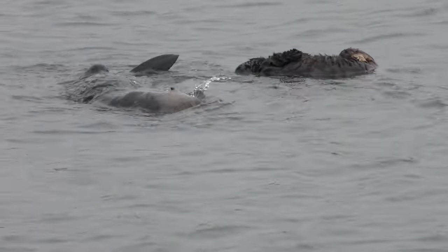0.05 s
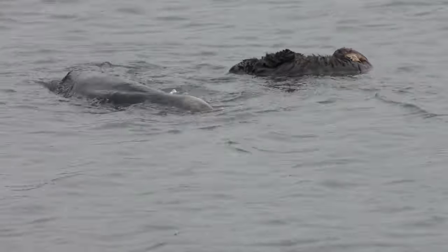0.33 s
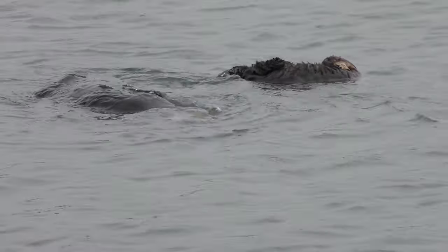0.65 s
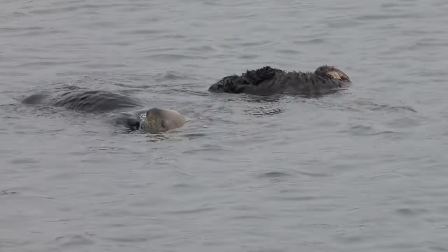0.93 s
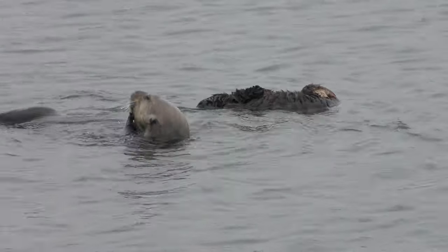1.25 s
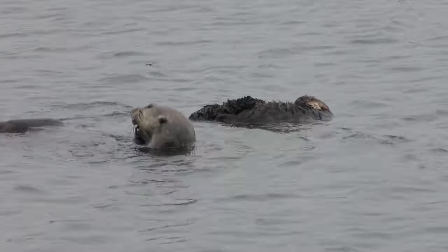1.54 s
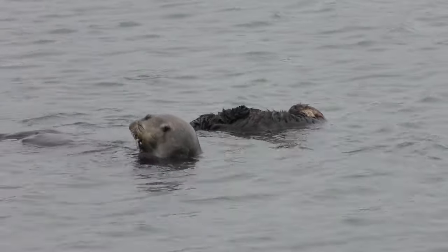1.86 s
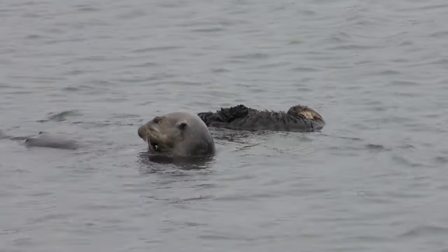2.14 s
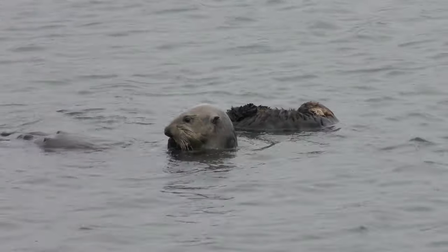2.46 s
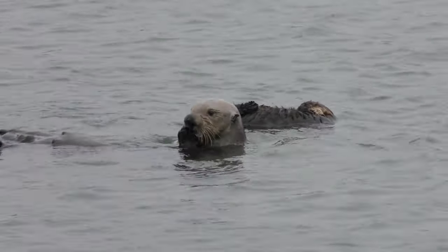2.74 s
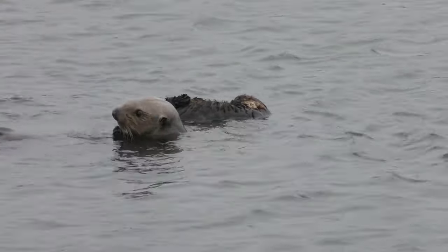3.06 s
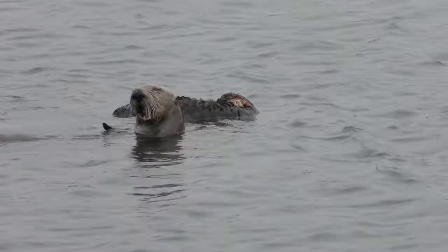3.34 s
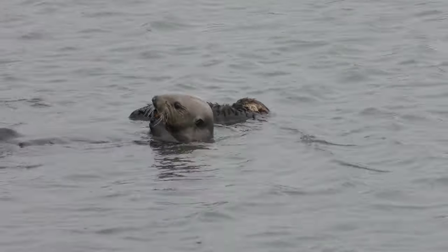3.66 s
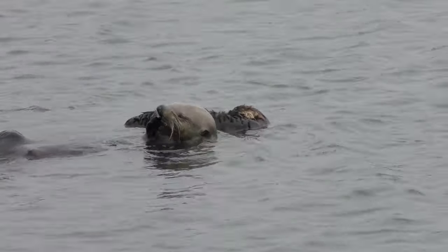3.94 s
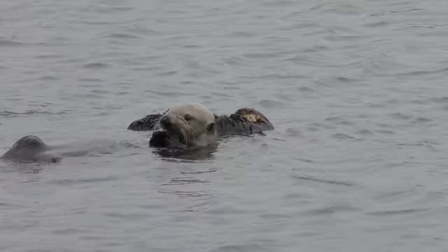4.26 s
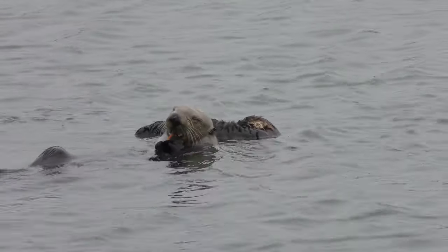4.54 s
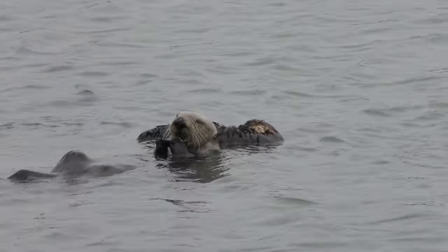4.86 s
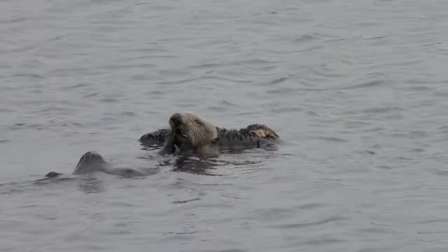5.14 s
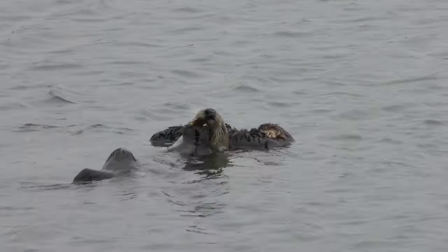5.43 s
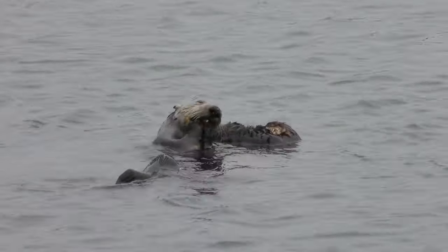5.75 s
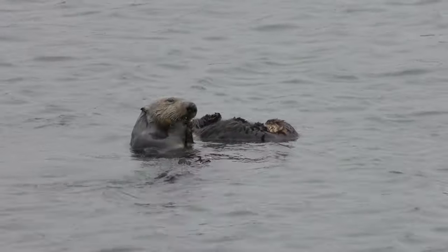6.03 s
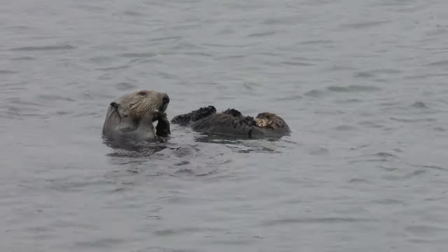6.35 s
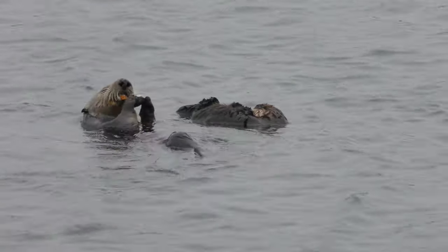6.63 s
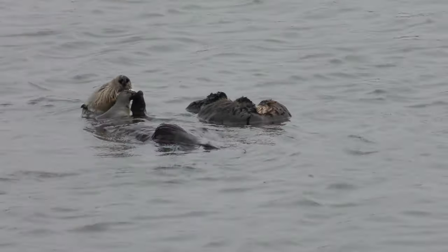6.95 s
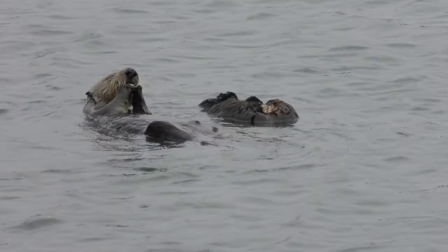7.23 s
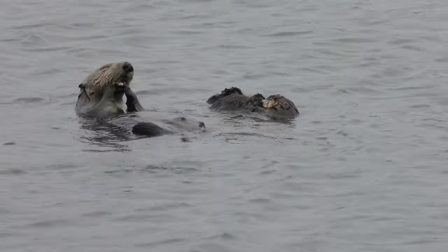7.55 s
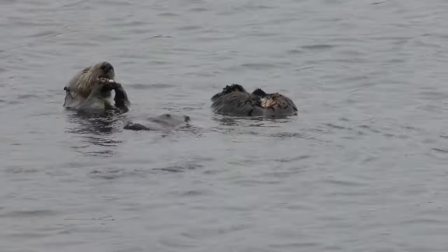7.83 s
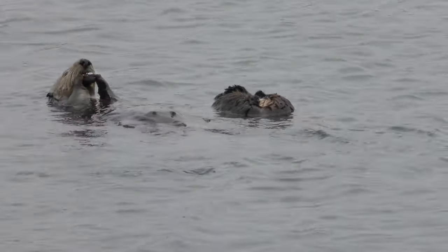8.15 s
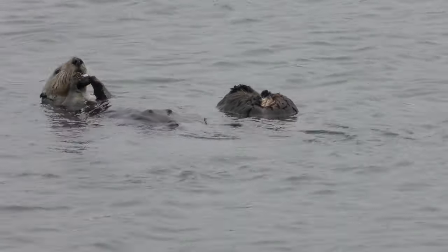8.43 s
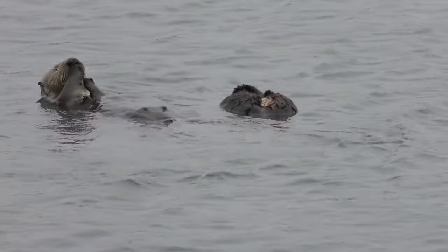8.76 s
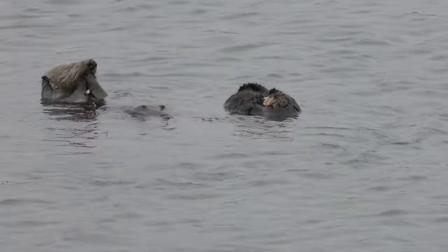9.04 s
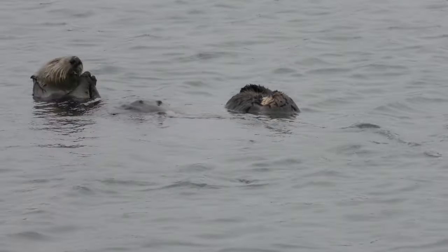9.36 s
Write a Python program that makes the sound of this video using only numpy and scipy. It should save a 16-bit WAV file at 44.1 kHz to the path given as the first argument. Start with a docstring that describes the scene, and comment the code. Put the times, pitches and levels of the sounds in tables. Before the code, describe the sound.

A sea otter feeds on calm open water, cracking shell in sharp, dry snaps with small ticks between, mostly in the first three seconds. Then a still camera close by fires three quick double shutter clicks, with one more crack among them. Wind buffets the microphone in short low gusts, easing later. A low rumble and soft wash of far ripples continue throughout, with very faint shorebird peeps and no echo.

```python
"""Sea otter feeding on calm water.

Shell cracks in sharp dry clicks (snap, knock, ring) and small pieces tick. A still camera close by
fires three bursts of two frames, its mirror ringing the body. Gusts buffet the microphone and distant
shorebirds peep, over a low rumble and the soft wash of far ripples."""
import sys
import numpy as np
from scipy import signal
from scipy.fft import rfft, irfft, next_fast_len
from scipy.io import wavfile
from scipy.ndimage import uniform_filter1d, map_coordinates

SR = 44100
rng = np.random.default_rng(int(sys.argv[2]) if len(sys.argv) > 2 else 0)


def master_out(mix):
    """Clip the mix to full scale and print it as 16-bit PCM to the path in sys.argv[1]."""
    frames = np.transpose(np.atleast_2d(mix))
    ceiling = np.clip(frames, -1, 1)
    pcm = np.round(ceiling * 32767).astype(np.int16)
    wavfile.write(sys.argv[1], SR, pcm)


N = 414099

# Shell fractures. Each row: start in seconds, knock in dB and Hz, ring in dB and Hz, snap in dB,
# pan (L-R) in dB, splinters in dB relative to the push, splinter T60 in seconds.
SHELL_CRACKS = [(0.6143, -11, 1020, -15.5, 2950, -19, 1, 2, 0.023),
                (1.2575, -32, 1700, -27, 2770, -44, 1.5, -9, .02),
                (1.7522, -12.5, 1310, -20, 2360, -42, -1, -4, 0.028),
                (2.1504, -23, 1000, -21.5, 3960, -19.5, 0, -16, 0.017),
                (2.5107, -6.5, 1250, -15.5, 2000, -14.5, 0.5, -5, 0.024),
                (3.1891, -4.5, 1080, -10, 2900, -22, -1, 12, .034),
                (5.3469, -11, 1040, -24, 1570, -33, 3, 7, .036)]
# Short high ticks: shell pieces, and at 6.05 s the sharp edge of a bird's peep.
# Each row: start in seconds, level in dB, pitch in Hz, overtone level in dB.
HIGH_TICKS = [(.038, -29, 3350, -33.5), (1.258, -47, 6600, -60), (2.863, -44, 6200, -55),
              (2.916, -36.5, 3680, -46), (3.269, -41, 6000, -47), (4.540, -56, 6000, -38),
              (5.642, -38, 5600, -35), (5.889, -41, 6000, -52), (6.051, -43, 5900, -60),
              (7.986, -45, 5700, -60), (8.1192, -36, 5250, -25)]

# Camera button presses. Each row: start in seconds, level in dB.
CAMERA_BURSTS = [(3.8905, -19), (5.0747, -22.5), (6.7189, -19)]
# Frames of a burst. Each row: delay in seconds, mirror-up time in seconds.
BURST_FRAMES = [(0, .0778), (.148, .0726)]
# Mirror contacts. Each row: offset from the swing in seconds, relative level in dB, T60 in seconds.
MIRROR_UP = [(.001, -7.5, .02), (.004, -5.5, 0.012), (.015, -3, .018), (.018, -10, 0.027)]
MIRROR_DOWN = [(-.025, -5.5, 0.064), (-.012, -11, .015), (.001, -1, 0.023), (.0035, -3, .022),
               (.011, -11, 0.075)]
# Camera body resonances. Each row: centre in Hz, width in Hz, gain in dB.
BODY_MODES = [(1530, 500, 8), (3580, 710, 4), (5400, 1200, -3.5), (7230, 640, 0.5), (9000, 1800, -6.5),
              (11400, 1300, -4.5), (14300, 1600, -12)]

# Gusts. Each row: start in seconds, level in dB, pan (L-R) in dB, time until release in seconds.
WIND_GUSTS = [(0.098, -38.5, 0, 0.1), (.358, -28, -1.5, 0.017), (1.083, -45, 1, .05),
              (1.424, -39, -3, .115), (1.595, -43.5, 2, 0.036), (2.217, -42, -3, 0.047),
              (2.404, -37, -5, 0.065), (2.424, -29.5, 2, 0.0085), (2.57, -30, -3, .025),
              (2.914, -27.5, 0.5, .017), (2.956, -30.5, -0.5, 0.043), (3.067, -33.5, -3, 0.067),
              (3.263, -29, -5, 0.0085), (3.272, -36.5, -3, .05), (3.457, -32, -2, 0.015),
              (3.982, -32, 0, 0.011), (4.3, -39.5, -1, 0.13), (4.636, -44, 0, .05), (5.342, -52, 2, 0.15),
              (5.974, -47, 3, 0.084), (6.338, -45, 3, 0.034), (6.742, -34.5, 1, .03),
              (9.162, -45.5, 1, 0.15)]
# Slow envelopes. Each row: time in seconds, level in dB.
BREEZE_LEVEL = [(0, -38.5), (.6, -38.5), (1.3, -40), (1.68, -35.5), (1.9, -50), (2.15, -47.5),
                (2.65, -39.5), (2.85, -47.5), (3.27, -38.5), (3.6, -50), (4.2, -59), (4.76, -42),
                (5.15, -61), (6.05, -41), (7.15, -49.5), (7.5, -41.5), (8.3, -56), (9.39, -56)]
RUMBLE_LEVEL = [(0, -45), (1.2, -42.5), (2.0, -40), (2.45, -39), (3.3, -40), (3.7, -43), (4.4, -42),
                (5.1, -43), (6.1, -39), (6.95, -38), (8.4, -44), (9.39, -42)]
# Bird phrases. Each row: start in seconds, level in dB, pitch in Hz, glide in Hz,
# note length in seconds, note count.
BIRD_PHRASES = [(3.295, -66.5, 3720, -500, .038, 2), (3.432, -68, 4020, -700, .03, 3),
                (4.21, -65, 3600, -400, .035, 1), (4.26, -58, 2315, -70, .055, 1),
                (5.695, -66, 4280, -150, .028, 1), (6.04, -67, 4400, -100, .03, 1),
                (6.38, -70.5, 3980, 250, .05, 1), (8.685, -69, 3850, 400, .035, 1),
                (9.08, -64, 3200, -300, .05, 1)]

# Spectral shapes. Each row: frequency in Hz, relative density in dB.
SNAP_SPECTRUM = [(600, -19), (2000, 12.5), (3800, -2), (5200, 1.5), (7500, -3.5), (9500, 2), (12000, 1),
                 (14000, -9), (16000, -11)]
BUFFET_SPECTRUM = [(20, -12), (50, -10), (110, -2), (190, 1.5), (290, -3.5), (400, -7.5), (550, -22),
                   (800, -33.5), (1500, -84)]
FLUTTER_SPECTRUM = [(80, -30), (250, 3), (400, -0.5), (600, -2), (900, -10), (1300, -14), (2000, -34),
                    (3000, -40), (6000, -67)]
RUMBLE_SPECTRUM = [(15, -33), (28, -21), (42, -5), (70, -2), (100, 0.5), (150, -2), (220, -6), (320, -11),
                   (500, -22.5), (800, -33.5), (2000, -78)]
WASH_SPECTRUM = [(200, 3), (500, -6.5), (750, -2.5), (1050, 1), (1450, 1.5), (2000, -3.5), (2550, -8),
                 (2800, -8.5), (3300, -14), (4200, -20.5), (6000, -36), (12000, -71)]
HISS_SPECTRUM = [(1000, -5.5), (5000, -7), (7000, -9.5), (9000, -5.5), (11500, -1.5), (14000, -1.5),
                 (16000, -3)]
# Stereo likeness. Each row: frequency in Hz, left-right correlation from -1 to 1.
WIND_CORRELATION = [(60, 0.64), (150, 0.88), (280, 0.75), (450, 0.32), (800, -0.56)]
SEA_CORRELATION = [(100, 0.99), (700, 1), (1300, 0.78), (2000, 0.66), (3500, 0.14)]


def shell_cracks():
    """Each fracture gives a damped knock, a brief hard ring and a bright snap."""
    out = np.zeros((2, N))
    for start_s, knock_db, knock_hz, ring_db, ring_hz, snap_db, pan_db, splinter_db, t60_s in SHELL_CRACKS:
        force = contact(splinter_db, t60_s, spread=0.74)
        knock = amp(knock_db) * struck_mode(force, knock_hz, width_hz=0.73 * knock_hz)
        ring = amp(ring_db) * struck_mode(force, ring_hz, width_hz=0.11 * ring_hz)
        add(out, start_s, knock + ring, pan_db)
        snap_force = contact(splinter_db + 13, 0.5 * t60_s, spread=0.28)
        snap = signal.fftconvolve(snap_force, impulse(SNAP_SPECTRUM), axes=1)
        add(out, start_s, amp(snap_db) * snap, pan_db)
    return out


def high_ticks(faint_count=9, faint_db=-49, scatter_db=2.5, centre_hz=6200):
    """Ticks with an overtone (shell pieces, one edge of a bird's peep), plus faint chips at random."""
    out = np.zeros((2, N))
    for start_s, db, hz, overtone_db in HIGH_TICKS:
        add(out, start_s, amp(db) * tick(hz) + amp(overtone_db) * tick(2.23 * hz), pan_db=1.0)
    for when, size, pitch in rng.random((faint_count, 3)):
        db = faint_db + scatter_db * (2 * size - 1)
        hz = centre_hz * 2 ** (pitch - 0.5)
        add(out, when * (N - 1) / SR, amp(db) * tick(hz), pan_db=1.5)
    return out


def tick(hz):
    """One short, high resonance; left energy 1."""
    force = contact(trail_db=4.8, t60_s=0.013, spread=0.39)
    ring = filtered(force, resonances([(hz, 0.2 * hz, 0)]))
    return ring / np.linalg.norm(ring[0])


def camera():
    """Each frame, the mirror swings up and falls back; its contacts ring the body, left of centre."""
    blows = np.zeros((2, N))
    for press_s, burst_db in CAMERA_BURSTS:
        for delay_s, up_s in BURST_FRAMES:
            frame_s = press_s + delay_s
            for swing_s, contacts in (frame_s, MIRROR_UP), (frame_s + up_s, MIRROR_DOWN):
                for offset_s, contact_db, t60_s in contacts:
                    force = contact(trail_db=7.9, t60_s=t60_s, spread=0.56)
                    add(blows, swing_s + offset_s, amp(burst_db + contact_db) * force, pan_db=6.5)
    return filtered(blows, resonances(BODY_MODES))


def wind(attack_s=0.0086, release_s=0.011, flutter_db=-46.5, strong_db=-34.5):
    """Turbulence at two microphone ports: gusts ride the breeze; stronger wind flutters brighter."""
    breeze_db = envelope(BREEZE_LEVEL) + 1.33 * wobble(30)
    per_port_db = 1.4 * np.array([wobble(17), wobble(14)])
    strength = amp(breeze_db + per_port_db)
    t = np.arange(SR // 3) / SR
    for start_s, db, pan_db, hold_s in WIND_GUSTS:
        gust = np.minimum(t / attack_s, 1) * np.exp(-np.maximum(t - hold_s, 0) / release_s)
        add(strength, start_s, amp(db) * gust, pan_db)
    buffet = strength * noise(BUFFET_SPECTRUM, WIND_CORRELATION, patchy_db=1.16)
    flutter_gain = amp(flutter_db) * (strength / amp(strong_db)) ** 1.64
    flutter = flutter_gain * noise(FLUTTER_SPECTRUM, WIND_CORRELATION, patchy_db=1.0)
    return buffet + panned(flutter, pan_db=-3)


def shorebirds(waver=0.022):
    """Short, wavering whistles; the glide reverses from note to note."""
    out = np.zeros((2, N))
    for start_s, db, pitch_hz, glide_hz, note_s, notes in BIRD_PHRASES:
        progress = np.linspace(0, 1, int(note_s * SR))
        arch = np.sqrt(np.abs(np.sin(np.pi * progress)))
        for k in range(notes):
            hz = pitch_hz + (-1) ** k * glide_hz * (progress - 0.5)
            hz *= 1 + waver * wobble(600, size=len(progress))
            whistle = arch * np.sin(2 * np.pi * np.cumsum(hz) / SR)
            add(out, start_s + k * note_s, amp(db) * whistle, pan_db=0)
    return out


def sea(wash_db=-51, hiss_db=-65.5):
    """Slowly swelling rumble, wash of far ripples and thin steady hiss."""
    rumble_gain = amp(envelope(RUMBLE_LEVEL) + 0.25 * wobble(7.6))
    rumble = rumble_gain * noise(RUMBLE_SPECTRUM, SEA_CORRELATION, patchy_db=1.5)
    wash = amp(wash_db + 0.17 * wobble(10)) * noise(WASH_SPECTRUM, SEA_CORRELATION, patchy_db=0.74)
    hiss_correlation = [(5000, 0.58), (9000, 0.95), (14000, 0.13)]
    hiss = amp(hiss_db) * noise(HISS_SPECTRUM, hiss_correlation, patchy_db=1.5)
    return rumble + panned(wash, pan_db=1.6) + hiss


def contact(trail_db, t60_s, spread):
    """Sharp push trailed by dying micro-contacts, spread in stereo; left energy 1."""
    t = np.arange(SR // 10) / SR
    mid, side = rng.standard_normal((2, len(t))) * amp(-60 * t / t60_s)
    force = np.array([mid + spread * side, mid - spread * side])
    force *= amp(trail_db) / np.linalg.norm(force[0])
    force[:, 0] += 1
    return force / np.linalg.norm(force[0])


def struck_mode(force, hz, width_hz):
    """Damped resonance, low-passed just above its pitch; mean channel energy 1."""
    mode = resonances([(hz, width_hz, 0)])
    edge_hz = 1.07 * hz + width_hz
    lowpass = lambda f: (1 + 1j * np.sqrt(2) * f / edge_hz - (f / edge_hz) ** 2) ** -2
    ring = filtered(force, lambda f: mode(f) * lowpass(f))
    return ring / np.sqrt(np.sum(ring ** 2) / 2)


def resonances(modes):
    """Causal response of band-pass modes, summed with alternating sign."""
    return lambda f: sum((-1) ** k * amp(db) * 1j * f * width_hz / (hz * hz - f * f + 1j * f * width_hz)
                         for k, (hz, width_hz, db) in enumerate(modes))


def impulse(spectrum, size=1024):
    """Minimum-phase pulse with this spectrum; energy 1."""
    magnitude = amp(at_hz(spectrum, np.fft.rfftfreq(size, 1 / SR)))
    cepstrum = irfft(np.log(magnitude))
    cepstrum[1:size // 2] *= 2
    cepstrum[size // 2 + 1:] = 0
    pulse = irfft(np.exp(rfft(cepstrum)))
    return pulse[None] / np.linalg.norm(pulse)


def noise(spectrum, correlation, patchy_db):
    """Shaped stereo noise with random gain patches in time and frequency; rms 1."""
    bins = signal.stft(rng.standard_normal((2, N)), nperseg=512)[2]
    patches = uniform_filter1d(rng.standard_normal(bins.shape[1:]), size=6, axis=0)
    patches = uniform_filter1d(patches, size=14, axis=1)
    pair = signal.istft(bins * amp(patchy_db * unit_rms(patches)), nperseg=512)[1][:, :N]
    angle = lambda hz: np.arccos(np.clip(at_hz(correlation, hz), -1, 1)) / 2
    response = lambda hz: amp(at_hz(spectrum, hz)) * [np.cos(angle(hz)), np.sin(angle(hz))]
    mid, side = filtered(pair, response)
    return unit_rms(np.array([mid + side, mid - side]))


def filtered(x, response):
    """Apply a complex frequency response by zero-padded FFT."""
    size = x.shape[-1]
    padded = next_fast_len(size + 8192)
    return irfft(rfft(x, padded) * response(np.fft.rfftfreq(padded, 1 / SR)), padded)[..., :size]


def wobble(rate_hz, size=N):
    """Smooth random curve with knots at rate_hz."""
    knots = rng.standard_normal(int(size * rate_hz / SR) + 4)
    return map_coordinates(knots, [np.arange(size) * rate_hz / SR])


def envelope(points):
    """Interpolate (seconds, dB) points to dB per sample."""
    times_s, levels_db = np.transpose(points)
    return np.interp(np.arange(N) / SR, times_s, levels_db)


def at_hz(points, hz):
    """Interpolate (Hz, value) points on a log axis."""
    knots_hz, values = np.transpose(points)
    return np.interp(np.log(hz + 1), np.log(knots_hz + 1), values)


def add(track, start_s, sound, pan_db):
    """Pan a sound and mix it into the track."""
    start = max(round(start_s * SR), 0)
    sound = panned(sound, pan_db)[:, :N - start]
    track[:, start:start + sound.shape[1]] += sound


def panned(sound, pan_db):
    """Tilt left over right by pan_db."""
    return sound * amp([[pan_db / 2], [-pan_db / 2]])


def amp(db):
    """Decibels to gain."""
    return 10 ** (np.asarray(db) / 20)


def unit_rms(x):
    """Scale to rms 1."""
    return x / np.sqrt(np.mean(x ** 2) + 1e-20)


def scene():
    """All sources in the open, no echo."""
    return sea() + wind() + shell_cracks() + high_ticks() + shorebirds() + camera()


def record(dry, cutoff_hz=15850):
    """Brick-wall low-pass."""
    return filtered(dry, lambda hz: hz < cutoff_hz)


dry = scene()
out = record(dry)
master_out(out)
```